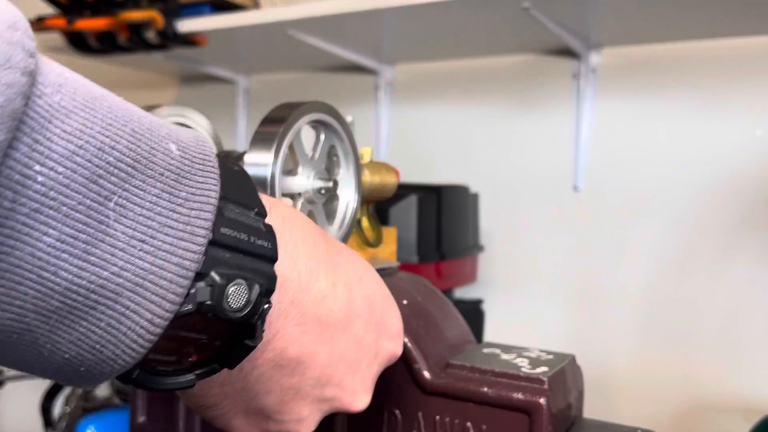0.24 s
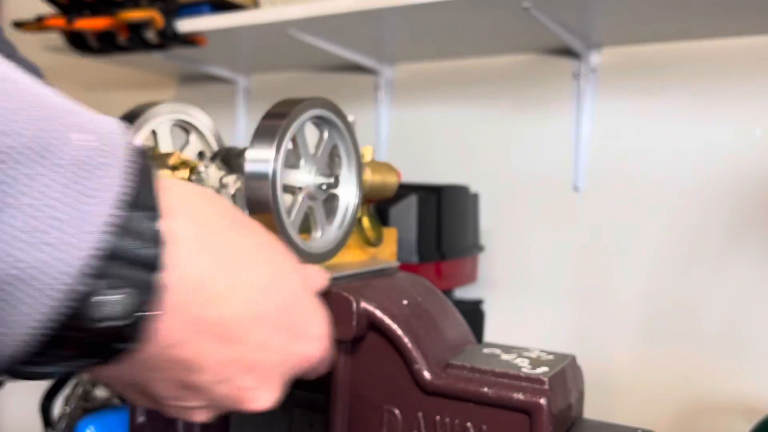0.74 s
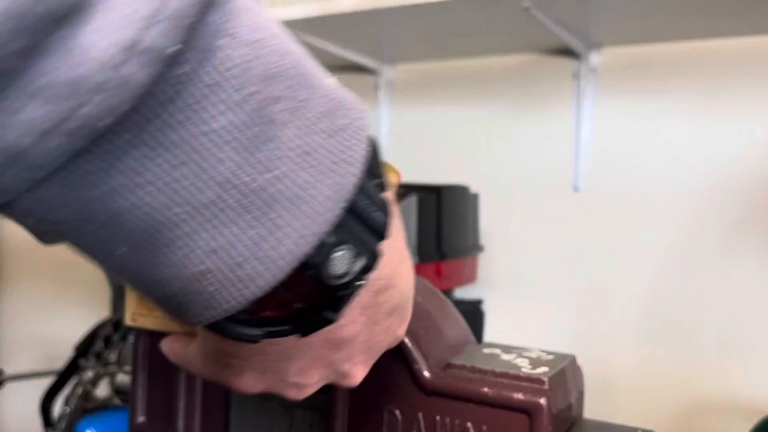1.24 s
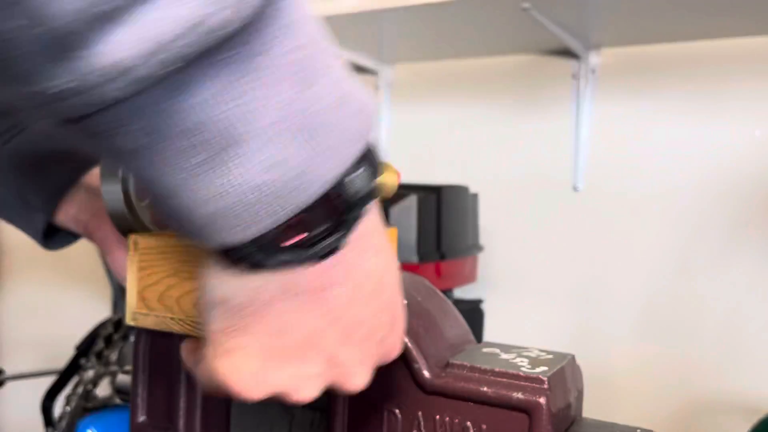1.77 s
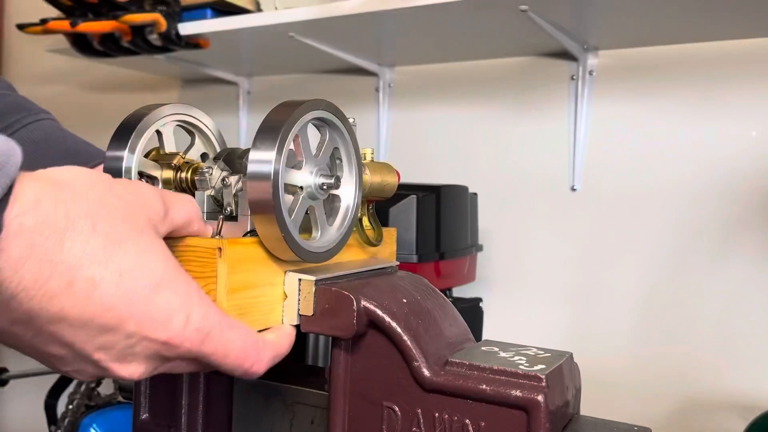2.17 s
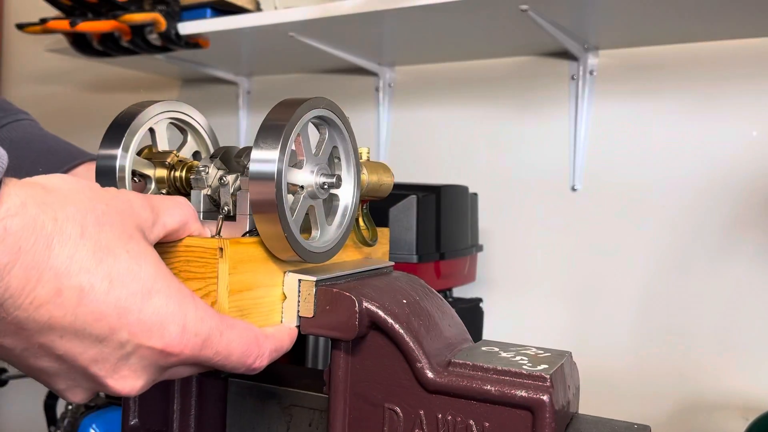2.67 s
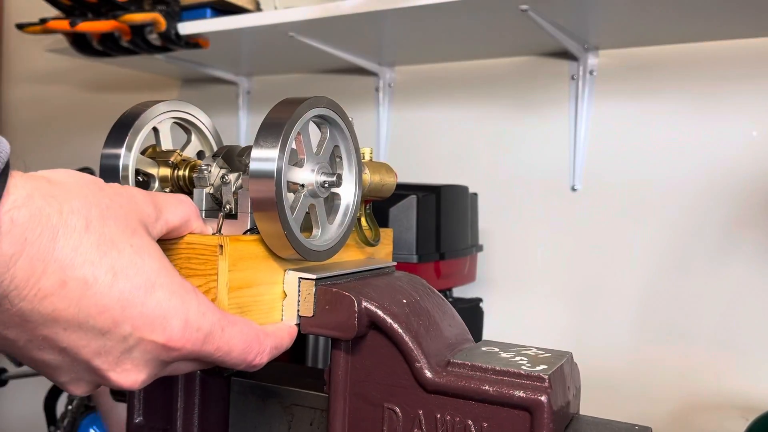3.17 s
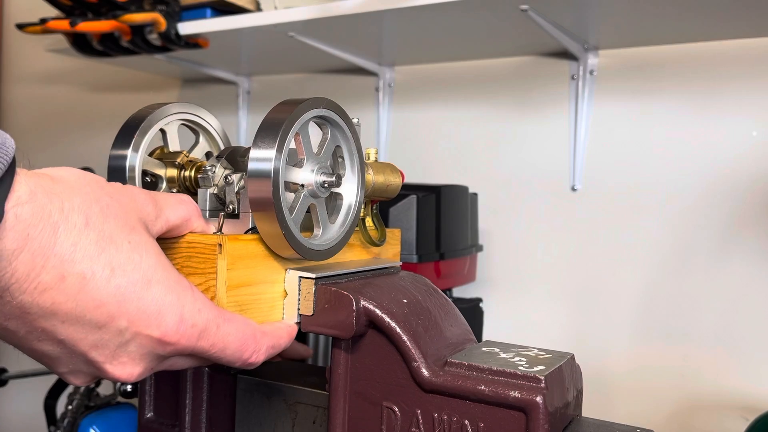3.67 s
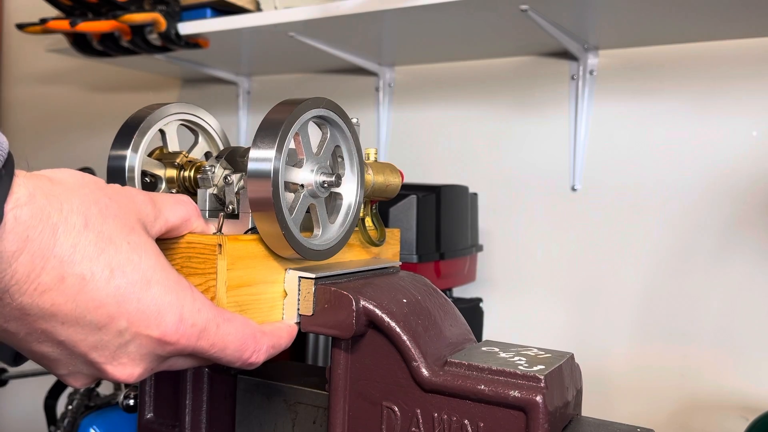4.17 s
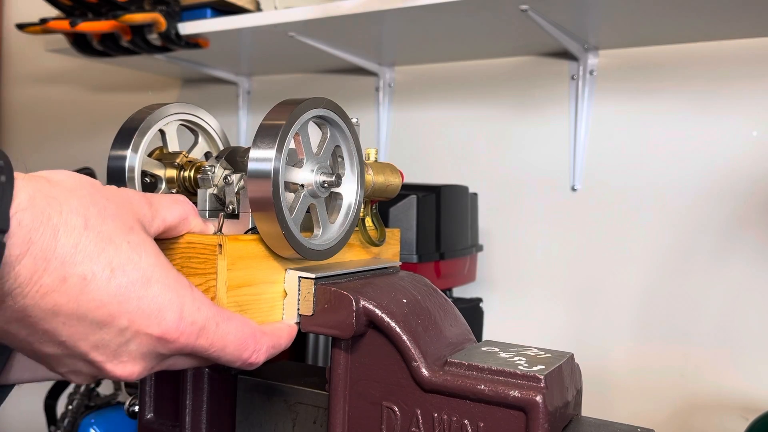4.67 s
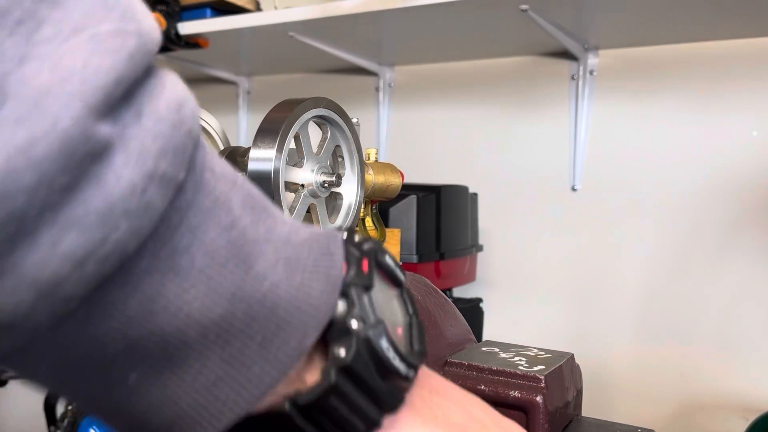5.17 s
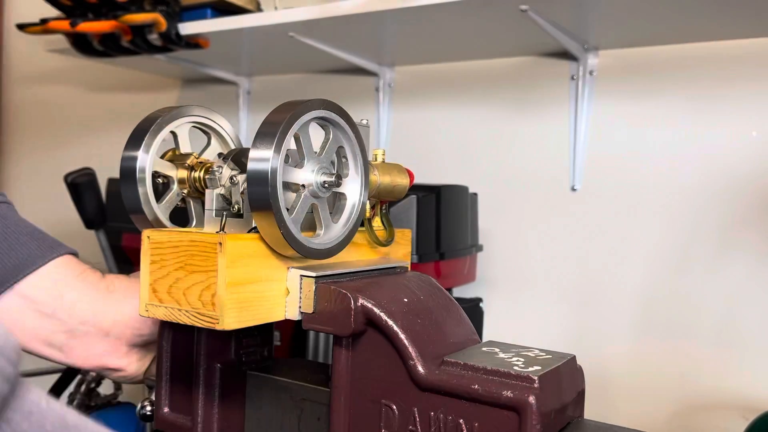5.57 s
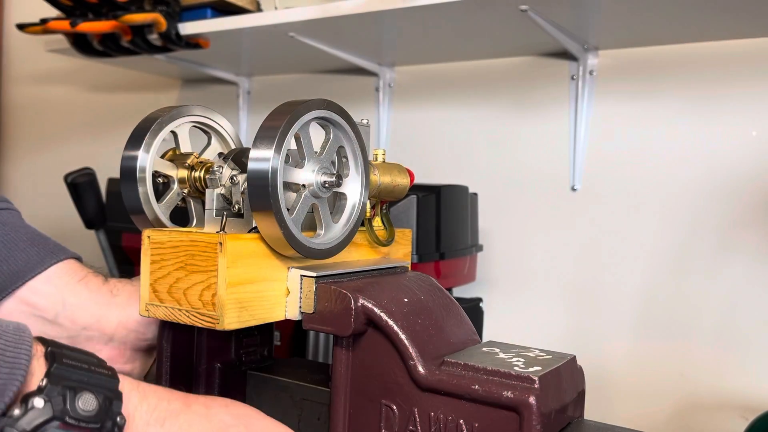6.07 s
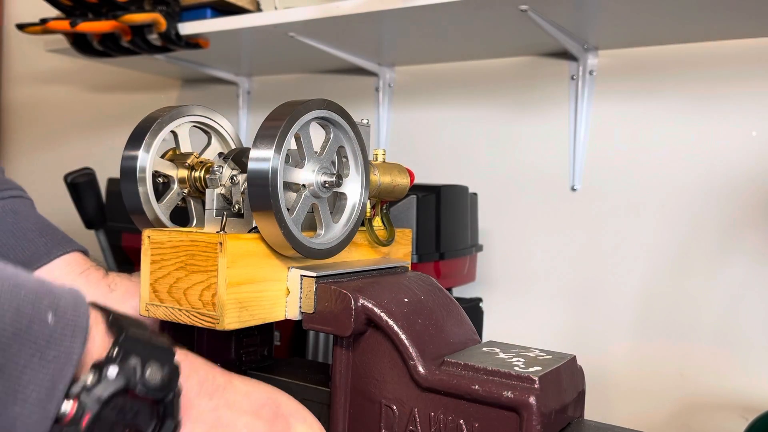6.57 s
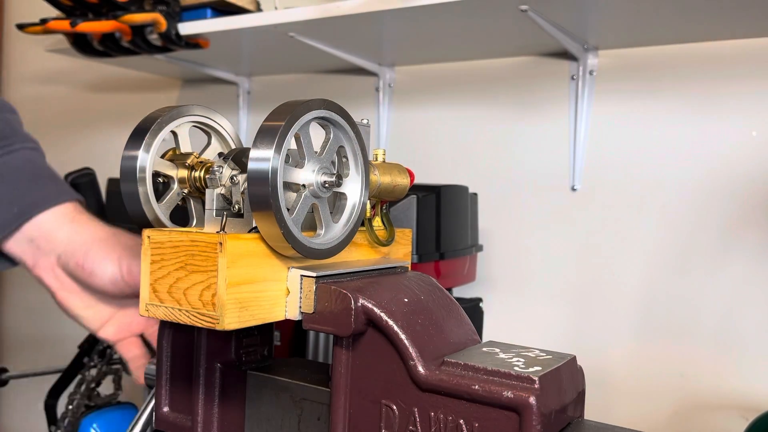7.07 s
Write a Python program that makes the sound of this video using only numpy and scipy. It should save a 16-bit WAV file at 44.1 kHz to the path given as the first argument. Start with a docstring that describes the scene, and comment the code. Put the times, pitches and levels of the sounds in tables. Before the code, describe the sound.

Close up in a quiet workshop, a sleeve makes short, dry rustles during the first second. Light knocks and small clicks follow as a wooden block is placed between steel vise jaws, the bench rumbling softly underneath. At about 3 seconds comes a louder knock, with dull wooden rubbing and low booms from the bench. A small steel part tinks at 4.4 seconds, and a quick cluster of knocks and clacks follows around 4.8. Just after 5 seconds the screw bites with a clack and a short groan. The sliding jaw scrapes hollowly twice, at about 5.3 and 5.7, amid ticks, thumps and faint brushing cloth. After a lull, from 6.7 seconds the screw is wound tight in jerks, grinding and juddering. A brief high squeal and a hoarse, falling creak peak around 7.1, with steel clunks at about 7.3.

```python
"""A wooden base carrying a small model engine is clamped in a steel bench vise in a workshop.
First come short, dry rustles, like a sleeve close by. The block is set between the jaws, knocking and
rubbing, while cloth brushes past, small steel parts tink and the bench booms dully under the hands.
After five seconds the screw bites and the sliding jaw scrapes and knocks in its guide. At the end the
screw is wound tight: the thread sticks and slips, so the vise grinds, judders, creaks and squeals."""
import sys
import numpy as np
from scipy import signal
from scipy.fft import rfft, irfft, next_fast_len
from scipy.io import wavfile
from scipy.ndimage import uniform_filter1d

SR = 44100
rng = np.random.default_rng(int(sys.argv[2]) if len(sys.argv) > 2 else 0)


def generate_wav(signal):
    """Clip the signal to [-1, 1] and save it as 16-bit WAV at the path in sys.argv[1]."""
    frames = np.transpose(np.atleast_2d(signal))
    scaled = np.clip(frames, -1, 1) * 32767
    pcm = np.round(scaled).astype(np.int16)
    wavfile.write(sys.argv[1], SR, pcm)


N = 323252
TIME = np.arange(N) / SR
STRAIN_S = 7.1  # the moment of greatest strain on the screw
# Bright modes of a sharp contact. Each row: pitch in Hz, level in dB, T60 in seconds.
EDGE = [(2950, -1, .12), (3900, -3, .1), (4280, -6, .1), (5120, -2, .06), (5990, -8, .1), (8330, -4, .06),
        (8720, -4, .06)]


def tightening():
    """Under load the thread sticks and slips, shaking the vise; growl and scrape grow with the grind."""
    # Jerks of the screw. Each row: start and hold in seconds, groan and grind levels in dB.
    jerks = [(5.094, 0.017, -33.5, -39.5), (5.127, 0.036, -41.5, -77), (6.627, 0.028, -56.5, -82),
             (6.683, 0.068, -49, -47.5), (6.754, 0.093, -48, -59), (6.844, 0.006, -36.5, -30.5),
             (6.879, 0.028, -39.5, -36), (6.922, 0.045, -39, -46), (6.976, 0.053, -40, -38.5),
             (7.048, 0.11, -41.5, -34.5), (7.176, 0.048, -38, -42), (7.25, 0.01, -37, -34),
             (7.305, 0.029, -36.5, -63)]
    # Resonances of the loaded vise. Each row: pitch and width in Hz, level in dB.
    vise_modes = [(269.3, 22, 4), (378.3, 15, -5.5), (422.4, 1.8, -11.5), (713.7, 20, -0.5), (815, 21, -4),
                  (874.7, 23, 5), (1020, 32, -2.5), (1607, 29, 1), (1770, 28, -18.5), (1868, 16, 4),
                  (1910, 56, -8.5), (2075, 48, 2.5), (2147, 47, 0.5), (2480, 29, -9), (2760, 10, -5),
                  (2970, 65, -7.5), (3420, 10, -5.5), (4320, 92, -16.5), (4870, 52, -16), (5760, 17, -9)]
    # Tone of the grinding thread. Each row: frequency in Hz, level in dB.
    grind_eq = [(88, -40), (150, -8.5), (271, -6.5), (600, -16.5), (868, -33.5), (1150, -13), (1600, -5),
                (2350, -19.5), (3470, -13), (3950, -32), (4330, -17.5), (7270, -40.5), (8430, -12.5),
                (9070, -50), (12400, -47), (16100, -91), (22000, -120)]
    # The dry thread hisses as the load comes on. Each row: start and hold in seconds, level in dB.
    hisses = [(6.68, 0.012, -50), (6.84, 0.2, -66)]
    s, hold_s, groan_db, grind_db = np.transpose(jerks)
    strain = np.exp(-((s - STRAIN_S) / 0.073) ** 2)
    effort_db = grind_db + 40.5
    growl_db = -38.5 + 0.45 * effort_db
    scrape_db = -51.5 + 0.56 * effort_db + 22 * strain  # brightest at the greatest strain
    groan, growl, grind, scrape = [swells(zip(s, hold_s, db), rise_s=0.02, fall_s=0.049)
                                   for db in (groan_db, growl_db, grind_db, scrape_db)]
    grain = slips(per_s=4500, size_db=2, judder_db=2, judder_rate=120)
    # the contact point travels round the thread, so each mode swells and fades on its own
    ringing = sum(from_db(db + 2.47 * drift(18)) * resonate(grain, [(hz, width, 0)])
                  for hz, width, db in vise_modes)
    body = rms_one(ringing) + from_db(-2) * rms_one(colour(grain, grind_eq))
    low = groan * steady(band(body, 163, 520)) + growl * steady(band(body, 474, 1040))
    middle = grind * steady(band(body, 1485, 2190))
    high = scrape * steady(band(body, 2570, 8700))
    hiss = swells(hisses, rise_s=.016, fall_s=0.11) * rms_one(band(grain, 8140, 9900, order=2))
    chatter = rms_one(from_db(1.5 * drift(45)))
    return low + (middle + high) * chatter + hiss


def squeal():
    """At the greatest strain two steel modes squeal; the upper one sinks as the screw slows."""
    # The squeal flares and hangs on. Each row: start and hold in seconds, upper and lower tone in dB.
    flares = [(7.048, .025, -46, -51), (7.083, 0.011, -30, -41), (7.103, 0.018, -38, -37.5),
              (7.143, .135, -57.5, -54.5)]
    s, hold_s, upper_db, lower_db = np.transpose(flares)
    upper, lower = [swells(zip(s, hold_s, db), rise_s=.015, fall_s=0.031) for db in (upper_db, lower_db)]
    sag_hz_per_s = 550
    upper_hz = 8220 - sag_hz_per_s * (TIME - STRAIN_S)
    return (upper * steel_tone(upper_hz, waver_hz=60, flutter_db=2.5)
            + lower * steel_tone(4255, waver_hz=35, flutter_db=2.5))


def creak():
    """The binding thread sings hoarsely on two partials an octave apart, lower as it slows."""
    # Rough creaks. Each row: start and hold in seconds, level in dB.
    creaks = [(7.075, 0.096, -40.5), (7.2, 0.056, -36.5)]
    sag_hz_per_s = 2400
    hz = 1845 - sag_hz_per_s * np.maximum(TIME - STRAIN_S, 0)
    upper = steel_tone(hz, waver_hz=60.6, flutter_db=2)
    lower = from_db(-3) * steel_tone(hz / 2, waver_hz=30.2, flutter_db=-4)
    return swells(creaks, rise_s=0.032, fall_s=0.042) * (upper + lower)


def knocks():
    """Knocks and clacks of block and vise, including the sliding jaw and the jerking screw."""
    # Knocks. Each row: start in seconds, thud peak in dB, then hollow knock, steel clack
    # and sharp edge in dB relative to the thud.
    hits = [(0.296, -45.5, -1.5, 3, -38), (0.373, -42.5, -21, -24, -7), (1.021, -47, -29, -29, -46),
            (1.129, -53.5, -13, 1, -9.5), (1.242, -46.5, -13, -14, -17), (1.939, -50, -32, -5, -7),
            (2.583, -51.5, -6, 3.5, -49.5), (2.692, -46.5, -9, -12, -22), (2.765, -53, -7, 4.5, -7.5),
            (3.045, -29, -12, 5, -7), (3.201, -36.5, -10, -30, -26), (3.249, -36.5, -20, -34, -30),
            (3.359, -53.5, -2.5, -12, -34), (4.762, -42, -15, -0.5, -10), (4.775, -35.5, -0.5, -5, -24),
            (4.796, -34, 1, -1.5, -24.5), (4.829, -38, -18, -4.5, -16.5),
            (4.939, -36.5, -7.5, -10.5, -27.5), (5.098, -32.5, -31, 7, -15.5),
            (5.521, -41.5, -40, -20, -19.5), (5.69, -49.5, 9, -22, -10.5), (6.058, -54.5, -19.5, -11.5, -6),
            (6.674, -33, 3.5, -5, -24), (6.844, -49, -20, 4, -17), (6.968, -38, 8, 6, -15),
            (7.252, -36.5, 1, 14.5, -20), (7.302, -31, -14, 2.5, -45)]
    # Modes of the wood, the hollow knock and the jaws. Each row: pitch in Hz, level in dB, T60 in seconds.
    wood_modes = [(172.4, -2, 0.44), (224.3, -1, 0.3), (269.7, 3.5, 0.21), (333.3, -0.5, 0.23),
                  (440, 6, 0.095), (541, -15.5, 0.2), (646, -14, 0.054)]
    hollow_modes = [(719, 3.5, 0.226), (812, 13.5, 0.1), (847, -2.5, 0.11), (1037, -0.5, 0.12)]
    jaw_modes = [(1302, 25, 0.051), (1538, 13.5, 0.12), (1745, 17.5, 0.083), (1860, 7.5, 0.26),
                 (2140, 1, 0.21), (2238, 4.5, 0.24), (2564, -10.5, 0.19), (2740, 6.5, 0.175)]
    out = np.zeros((2, N))
    for s, db, hollow_db, clack_db, edge_db in hits:
        thud = blow(wood_modes, (178, 529), rise_s=0.0014, t60=0.045, ring_db=2.5, room_db=-15.5)
        hollow = blow(hollow_modes, (630, 1187), rise_s=0.0017, t60=0.062, ring_db=0.5, room_db=-17)
        hollow = from_db(hollow_db) * band(hollow, 420, 1330)
        clack = blow(jaw_modes, (997, 2670), rise_s=0.00031, t60=0.032, ring_db=0, room_db=-18)
        # a soft contact, with little edge, stirs only the lowest modes of the jaws
        top_hz = np.clip(3500 * 2 ** ((edge_db - clack_db + 25) / 14), 1500, 9000)
        clack = band(clack, 350, top_hz, order=2)
        clack = from_db(clack_db) * clack / np.abs(clack).max()
        edge = blow(EDGE, (2800, 9500), rise_s=.002, t60=.045, ring_db=-4, room_db=-18)
        add(out, s, from_db(db) * (thud + hollow + clack + from_db(edge_db) * edge))
    return out


def bench_bumps():
    """Soft heavy pushes set the bench top booming."""
    # Bumps that reach the bench. Each row: start in seconds, peak in dB.
    bumps = [(0.019, -43.5), (3.066, -32), (3.22, -28.5), (3.252, -34), (4.957, -39), (5.15, -34),
             (5.525, -30)]
    # Modes of the bench top. Each row: pitch in Hz, level in dB, T60 in seconds.
    bench_modes = [(57.6, 10.5, 0.3), (71, 2.5, 0.1), (120, 1, 0.4), (147.4, 1, 0.43), (176.7, -3, 0.22),
                   (222, -5.5, 0.23)]
    out = np.zeros((2, N))
    for s, db in bumps:
        boom = blow(bench_modes, (52.5, 215), rise_s=0.0027, t60=0.41, ring_db=-2.5, room_db=5.5)
        add(out, s, from_db(db) * boom)
    return out


def block_rub():
    """Wood drags over the jaws with a low, dull friction."""
    # Rubs. Each row: start and hold in seconds, level in dB.
    strokes = [(2.395, 0.12, -53.5), (3.11, .09, -49), (3.205, 0.033, -47.5), (3.35, 0.065, -65),
               (3.495, 0.045, -68.5), (3.732, 0.045, -64), (4.97, 0.026, -52), (5.59, .035, -58),
               (6.07, 0.12, -63)]
    # Tone of wood on steel. Each row: frequency in Hz, level in dB.
    rub_eq = [(94, -56), (160, -10), (232, 1.5), (342, -9), (378, -3.5), (648, -15), (1010, -21.5),
              (1130, -18), (1250, -25.5), (2910, -33.5), (9000, -54), (11700, -85.5), (19800, -120)]
    grain = slips(per_s=9000, size_db=2, judder_db=1.5, judder_rate=50)
    return rms_one(colour(grain, rub_eq)) * swells(strokes, rise_s=0.074, fall_s=0.061)


def jaw_slide():
    """The sliding jaw scrapes hollowly in its guide."""
    # Moves of the jaw. Each row: start and hold in seconds, level in dB.
    strokes = [(5.295, 0.09, -45), (5.645, 0.075, -46.5)]
    # Tone of the guide. Each row: frequency in Hz, level in dB.
    slide_eq = [(150, -4.5), (250, 2.5), (398, -10.5), (474, 1), (558, -26), (656, -2), (753, -14.5),
                (854, -6.5), (968, -15.5), (1450, -22), (5000, -44), (6500, -44), (11000, -120)]
    grain = slips(per_s=9000, size_db=2, judder_db=1.5, judder_rate=50)
    return rms_one(colour(grain, slide_eq)) * swells(strokes, rise_s=0.035, fall_s=0.14)


def dry_rustle():
    """Short, dry rasping brushes, like a sleeve close to the microphone."""
    # Rustles. Each row: start and hold in seconds, level in dB.
    strokes = [(0.0, 0.06, -54.5), (0.272, 0.0075, -62), (0.362, 0.034, -46.5), (0.652, 0.058, -52.5),
               (1.96, 0.063, -68.5), (2.098, 0.051, -57), (3.495, 0.028, -70), (4.738, 0.013, -55)]
    # Tone of the rasp. Each row: frequency in Hz, level in dB.
    rasp_eq = [(470, -4.5), (800, -7), (1020, -12.5), (1240, 3.5), (1390, -2.5), (2550, -8), (2930, -4),
               (4180, -14), (4790, -13), (9110, -11), (10100, -26), (11200, -7), (12400, -38), (16100, -55),
               (22000, -120)]
    # Resonances in the rasp. Each row: pitch and width in Hz, level in dB.
    rasp_modes = [(1460, 53, -20), (2820, 19, -16.5), (5800, 76, -48), (8850, 50, -25)]
    grain = slips(per_s=9000, size_db=-1.5, judder_db=2.0, judder_rate=110)
    rasp = rms_one(colour(grain, rasp_eq)) + from_db(-9.5) * resonate(grain, rasp_modes)
    return rms_one(rasp) * swells(strokes, rise_s=0.048, fall_s=0.054)


def ticks():
    """Grit and a watch strap click drily, each click strongest around its own pitch."""
    # Clicks. Each row: start in seconds, peak in dB, centre in Hz.
    clicks = [(0.259, -48.5, 2400), (1.867, -57, 4800), (2.09, -43, 8000), (2.113, -41, 10000),
              (2.244, -50, 9800), (2.762, -44.5, 8300), (2.7764, -49, 2960), (3.7944, -52.5, 4500),
              (4.7317, -36, 3440), (4.795, -44.5, 2840), (4.8489, -42.5, 8130), (5.202, -45.5, 8300),
              (5.26, -37.5, 9200), (5.294, -44, 4320), (5.3283, -44.5, 8610), (6.011, -61, 5900),
              (6.452, -62.5, 9500)]
    out = np.zeros((2, N))
    for s, db, hz in clicks:
        tick = blow(EDGE, (1100, 12000), rise_s=.0006, t60=.025, ring_db=-11, room_db=-22)
        tick = band(tick, hz / 1.29, hz * 1.23, order=1)
        add(out, s, from_db(db) * tick / np.abs(tick).max())
    return out


def tinks():
    """Small steel parts touch and ring briefly."""
    # Touches. Each row: start in seconds, peak in dB.
    touches = [(3.592, -64), (4.385, -39.5), (4.572, -63.5)]
    # Modes of the parts. Each row: pitch in Hz, level in dB, T60 in seconds.
    part_modes = [(1250, -21, .04), (3120, -9, .05), (3990, 1, .12), (4080, -3, .08), (4370, -5, .09),
                  (5593, -6, .05), (7655, 3, .045), (8300, -1, .04)]
    out = np.zeros((2, N))
    for s, db in touches:
        tink = blow(part_modes, (1100, 9500), rise_s=.0005, t60=.02, ring_db=0, room_db=-23)
        add(out, s, from_db(db) * tink)
    return out


def handle_pings():
    """The loose handle rings faintly on one thin tone."""
    # Pings. Each row: start in seconds, level in dB.
    pings = [(0.71, -65.5), (1.2, -65.5), (1.911, -68)]
    rise_s, t60 = 0.025, 0.4
    out, t = np.zeros((2, N)), np.arange(SR) / SR
    tone = steel_tone(4590, waver_hz=25, flutter_db=3.0)[:SR] * np.ones((2, 1))
    for s, db in pings:
        add(out, s, from_db(db - 60 * t / t60) * (1 - np.exp(-t / rise_s)) * tone)
    return out


def sleeve():
    """Sleeve and hand brush past; cloth catches in fewer, more uneven snags than wood."""
    # Brushes. Each row: start and hold in seconds, level in dB.
    strokes = [(1.2, 0.037, -73.5), (1.68, 0.12, -79), (1.86, 0.13, -77), (2.06, 0.14, -68.5),
               (4.42, 0.02, -70), (4.89, 0.83, -66.5), (5.42, .08, -67.5), (5.83, 0.1, -65),
               (6.06, 0.029, -70)]
    # Tone of the cloth. Each row: frequency in Hz, level in dB.
    cloth_eq = [(530, -6), (900, -10), (1180, -6.5), (1540, -12), (1900, -6), (2070, -9.5), (4880, -21),
                (9340, -12.5), (12400, -31), (16100, -57.5), (22000, -120)]
    snags = slips(per_s=2200, size_db=4, judder_db=3.5, judder_rate=30)
    return rms_one(colour(snags, cloth_eq)) * swells(strokes, rise_s=0.15, fall_s=0.178)


def bench_rumble():
    """The bench rumbles as the hands push and shift the work."""
    # Pushes. Each row: start and hold in seconds, level in dB.
    pushes = [(0.0, 0.045, -44.5), (0.32, 0.19, -49.5), (0.67, 0.11, -53.5), (1.045, 0.05, -55.5),
              (1.135, 0.071, -46), (1.27, 0.061, -54), (1.53, 0.024, -60.5), (1.77, 0.028, -55),
              (1.96, 0.24, -52), (2.34, 0.2, -61.5), (2.54, 0.093, -52), (2.785, 0.01, -52.5),
              (3.075, 0.12, -48.5), (3.23, 0.027, -31.5), (3.31, 0.041, -39.5), (3.53, 0.087, -48.5),
              (3.765, 0.1, -47), (4.82, 0.21, -44.5), (5.15, 0.37, -51.5), (5.47, 0.14, -43.5),
              (5.73, 0.16, -59), (6.05, 0.17, -58), (6.31, 0.019, -58.5), (6.68, 0.49, -50.5),
              (7.23, 0.11, -50.5)]
    # Tone of the rumble. Each row: frequency in Hz, level in dB.
    rumble_eq = [(15, -52.5), (25, -28), (38, -15.5), (53, 7), (71, 3), (102, -7), (129, -1), (178, -20),
                 (220, -18.5), (320, -23.5), (420, -41.5), (700, -120)]
    noise = spread(rng.standard_normal((2, N)))
    return steady(colour(noise, rumble_eq)) * swells(pushes, rise_s=0.07, fall_s=0.12)


def room_tone():
    """A faint, bass-heavy bed of workshop air."""
    # Tone of the air. Each row: frequency in Hz, level in dB.
    air_eq = [(15, -27.5), (25, -0.5), (53, 3.5), (85, -2.5), (259, -9), (509, -20), (3300, -33.5),
              (8860, -30), (10100, -43), (11200, -25.5), (12400, -38.5), (16100, -66), (22000, -120)]
    noise = spread(rng.standard_normal((2, N)))
    return from_db(-70.5) * rms_one(colour(noise, air_eq))


def slips(per_s, size_db, judder_db, judder_rate):
    """Friction: tiny slips of uneven size, with a juddering level."""
    sizes = from_db(size_db * np.minimum(rng.exponential(1, (2, N)), 4)) * rng.choice([-1, 1], (2, N))
    slipping = rng.random((2, N)) < per_s / SR
    return rms_one(spread(sizes * slipping) * from_db(judder_db * drift(judder_rate)))


def steel_tone(hz, waver_hz, flutter_db):
    """A singing steel mode, unsteady in pitch and strength."""
    tone = np.sin(2 * np.pi * np.cumsum(hz + waver_hz * drift(300)) / SR)
    return rms_one(tone * from_db(flutter_db * drift(170)))


def blow(modes, crowd_hz, rise_s, t60, ring_db, room_db):
    """One blow of height 1: a crowd of short-lived modes, a few that ring on, and the room's tail."""
    room_t60 = 0.36
    t = np.arange(SR // 2) / SR
    hz, db, mode_t60 = np.transpose(modes)[:, :, None]
    shape = (2, len(modes), 1)
    strength = from_db(db + rng.normal(0, 2.5, shape)) * rng.choice([-1, 1], shape)
    partials = strength * np.sin(2 * np.pi * hz * t) * from_db(-60 * t / mode_t60)
    ring = partials.sum(axis=1) / np.sqrt(np.sum(from_db(db) ** 2))
    crowd = rms_one(band(rng.standard_normal((2, len(t))), *crowd_hz))
    fade = from_db(-60 * t / t60) + from_db(room_db - 60 * t / room_t60)
    hit = spread(crowd * fade + from_db(ring_db) * ring) * (1 - np.exp(-t / rise_s))
    return hit / np.abs(hit.mean(axis=0)).max()


def resonate(x, modes):
    """Ring parallel resonators of alternating polarity, at unit power."""
    out = 0
    for k, (hz, width_hz, db) in enumerate(modes):
        r = np.exp(-np.pi * width_hz / SR)
        poles = [1, -2 * r * np.cos(2 * np.pi * hz / SR), r * r]
        out = out + (-1) ** k * from_db(db) * signal.lfilter([1 - r, 0, r - 1], poles, x)
    return rms_one(out)


def swells(strokes, rise_s, fall_s):
    """Envelope of strokes: each grows tenfold per rise_s, holds, and dies tenfold per fall_s."""
    out = np.zeros(N)
    for s, hold_s, db in strokes:
        decades = np.maximum(s - TIME, 0) / rise_s + np.maximum(TIME - s - hold_s, 0) / fall_s
        near = decades < 5
        out[near] = np.maximum(out[near], from_db(db) * 10 ** -decades[near])
    return out


def steady(x):
    """Friction feeds a vibration at an even rate: level out chance swells slower than 40 ms."""
    return x / np.sqrt(uniform_filter1d(np.mean(x ** 2, axis=0), size=SR // 25) + 1e-12)


def drift(per_s):
    """A random wander of unit power."""
    knots = rng.standard_normal(4000)
    return rms_one(np.interp(TIME * per_s, np.arange(len(knots)), knots))


def spread(pair):
    """Two unrelated signals become mid and side: centred bass, a more diffuse midrange."""
    # Stereo width. Each row: frequency in Hz, side relative to mid in dB.
    side_eq = [(40, -17.5), (90, -18.5), (180, -11.5), (350, -7.5), (700, -2.5), (1400, -3), (2800, -5),
               (5600, -10), (9000, -41.5)]
    return pair[0] + colour(pair[1], side_eq) * np.array([[1], [-1]])


def colour(x, eq):
    """Filter by an EQ curve of (Hz, dB) points."""
    hz, db = np.transpose(eq)
    size = next_fast_len(x.shape[-1])
    bins = np.fft.rfftfreq(size, 1 / SR) + 1e-3
    gain = from_db(np.interp(np.log(bins), np.log(hz), db))
    return irfft(rfft(x, size) * gain, size)[..., :x.shape[-1]]


def band(x, low_hz, high_hz, order=3):
    """Causal band-pass."""
    sos = signal.butter(order, [low_hz, min(high_hz, .45 * SR)], "band", fs=SR, output="sos")
    return signal.sosfilt(sos, x)


def add(out, s, sound):
    """Mix a sound in at s seconds."""
    start = max(int(s * SR), 0)
    out[:, start:start + sound.shape[1]] += sound[:, :N - start]


def from_db(db):
    """Decibels to gain."""
    return 10 ** (np.asarray(db) / 20)


def rms_one(x):
    """Scale to unit power."""
    return x / np.sqrt(np.mean(x ** 2) + 1e-20)


def scene():
    """The vise is close up: its bright sounds just left of centre, the dull handling a little right."""
    air = room_tone()
    bright = tightening() + squeal() + creak() + dry_rustle() + ticks() + tinks() + handle_pings()
    handling = knocks() + bench_bumps() + block_rub() + jaw_slide() + sleeve() + bench_rumble()
    return bright * from_db([[.6], [-.6]]) + handling * from_db([[-.7], [.7]]) + air


def record(dry):
    """The two microphone ports hear slightly out of step; the deepest bass and the top are cut."""
    # Phase between the ports. Each row: frequency in Hz, lead of the left port in radians.
    ports = [(0, -0.16), (300, -0.4), (900, -0.22), (1700, 1), (2800, 1), (3600, 0.96), (7000, 1),
             (8800, 1)]
    low_cut_hz, high_cut_hz = 43, 12200
    hz, lead = np.transpose(ports)
    size = next_fast_len(N)
    phase = np.interp(np.fft.rfftfreq(size, 1 / SR), hz, lead) * np.array([[.5], [-.5]])
    heard = irfft(rfft(dry, size) * np.exp(1j * phase), size)[:, :N]
    lean = signal.sosfilt(signal.butter(5, low_cut_hz, "high", fs=SR, output="sos"), heard)
    return signal.sosfilt(signal.ellip(8, .5, 70, high_cut_hz, fs=SR, output="sos"), lean)


dry = scene()
out = record(dry)
generate_wav(out)
```